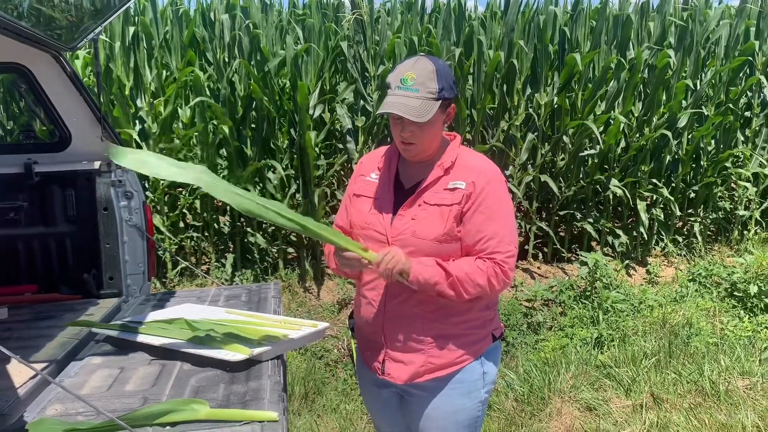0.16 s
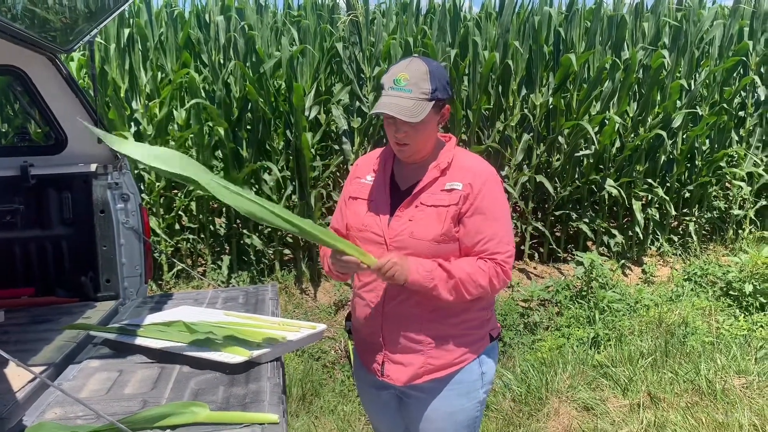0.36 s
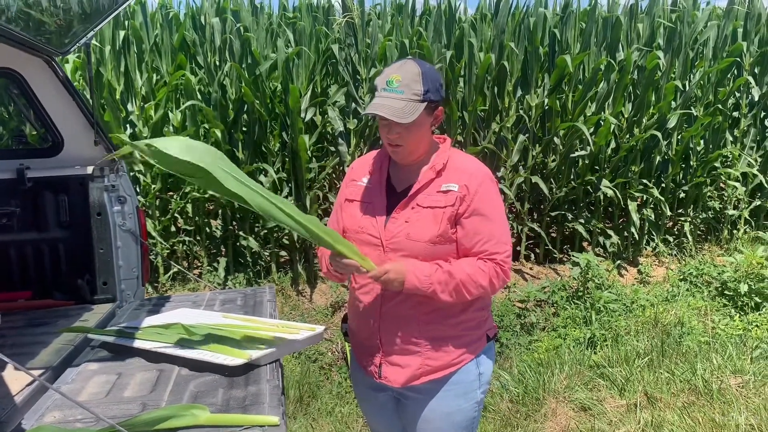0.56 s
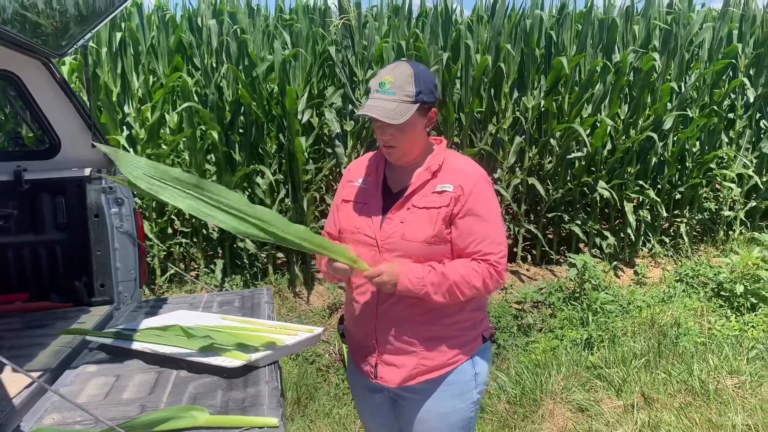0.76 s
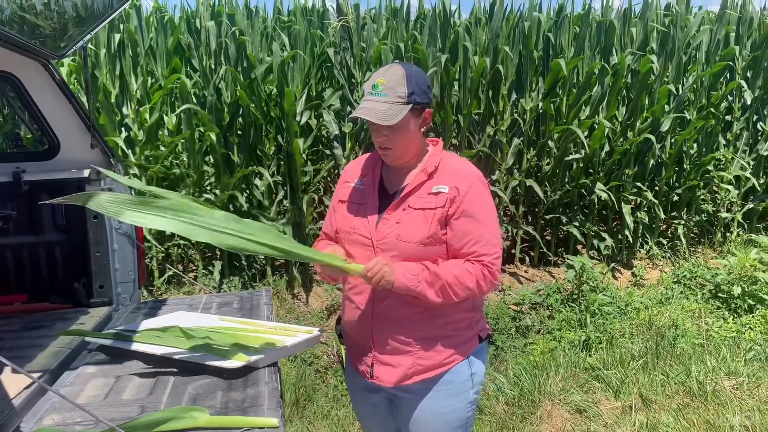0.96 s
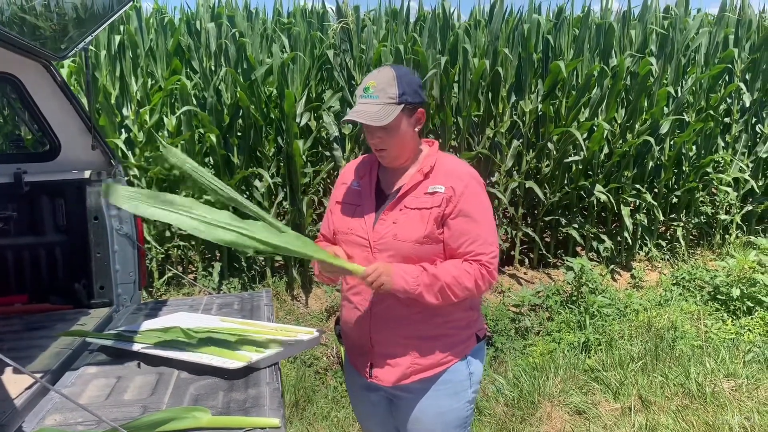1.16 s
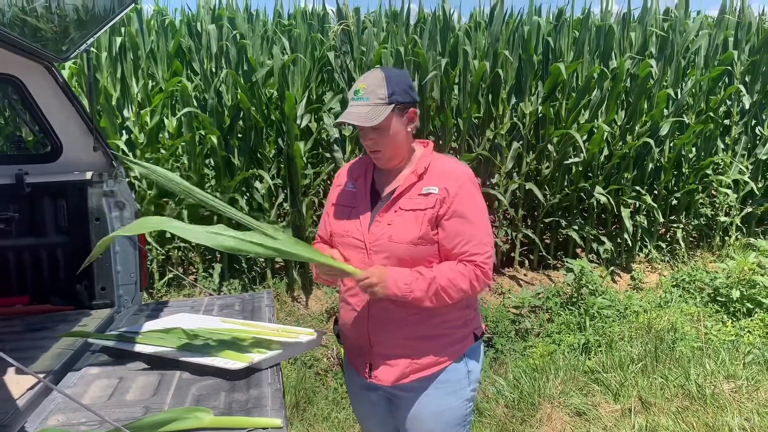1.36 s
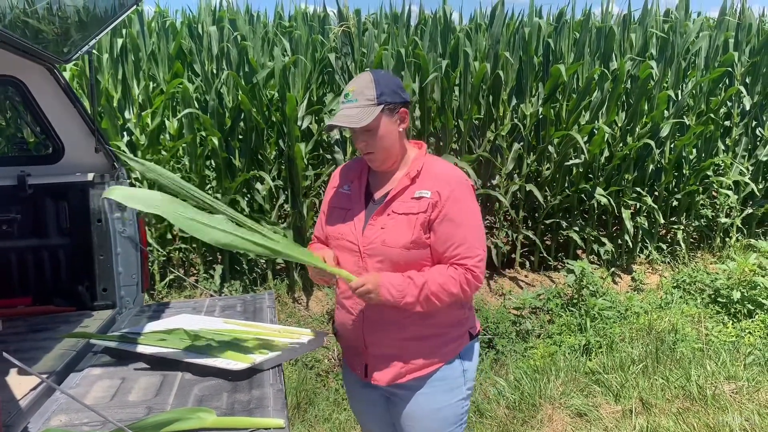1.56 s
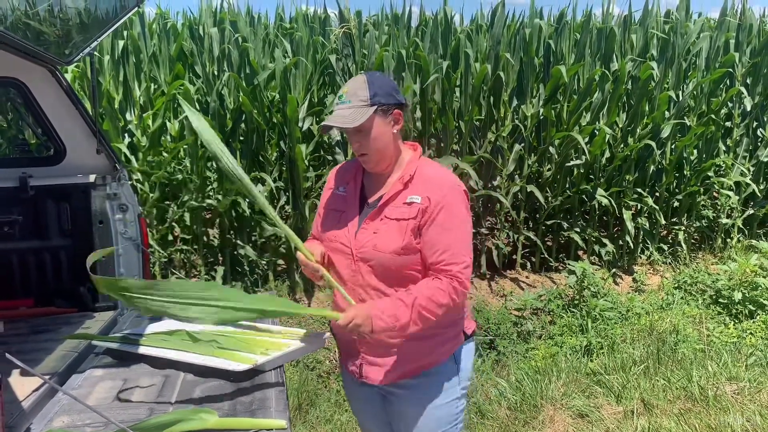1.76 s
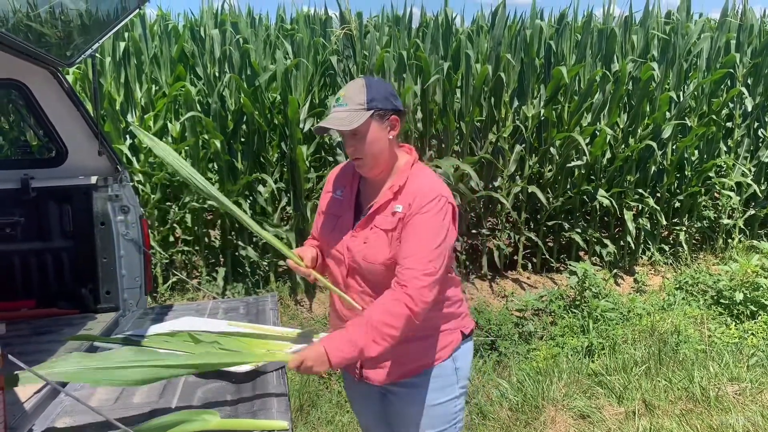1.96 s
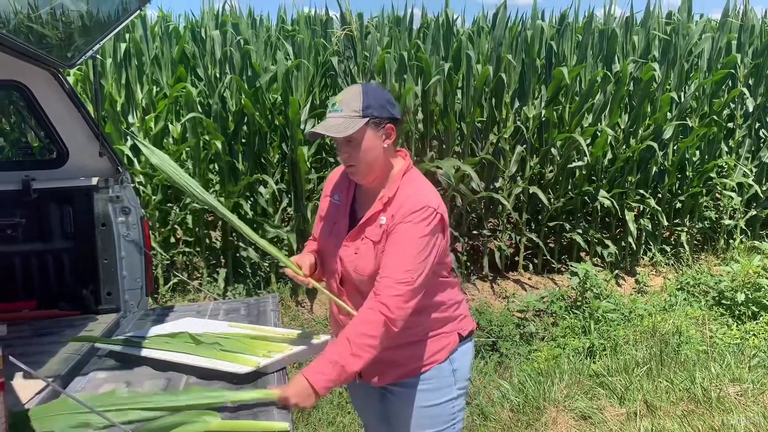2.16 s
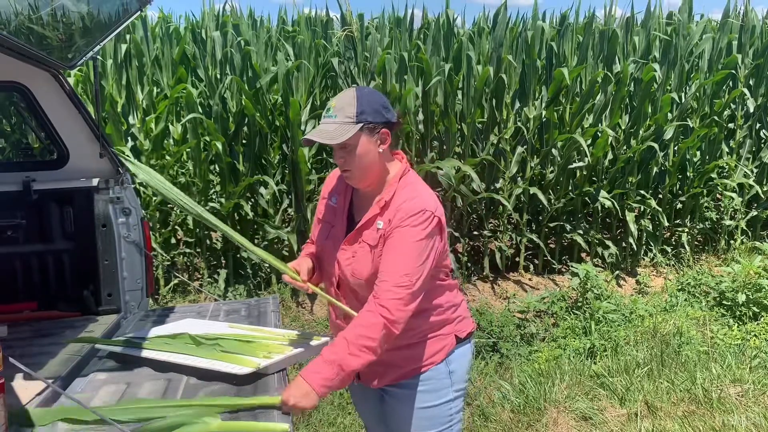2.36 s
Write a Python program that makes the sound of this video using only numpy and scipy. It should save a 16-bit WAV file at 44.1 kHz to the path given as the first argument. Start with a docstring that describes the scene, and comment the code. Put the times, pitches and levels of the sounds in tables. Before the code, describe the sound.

Fresh corn leaves are peeled off by hand: sharp snaps and dull flexing thwips, a hollow crunch, more crackles, then a soft pat and slide on a truck tailgate; close stereo microphone outdoors, low rumble.

```python
"""Long green corn leaves are peeled off a stalk by hand, over a low outdoor rumble, a faint hiss and rustling sleeves.
First ribs snap (crumbling cracks and a ringing tone) and leaves flex with dull falling thwips (dispersed pulses).
The rolled stem then crunches when squeezed (hollow bursts), and more snaps follow, with blades rubbing (noisy grains).
Last the freed leaf pats a truck's tailgate (clicks), whose panel hums (sine modes); it slides and its edge scrapes."""
import sys
import numpy as np
from scipy import signal
from scipy.fft import rfft, irfft
from scipy.io import wavfile

SR = 44100
rng = np.random.default_rng(int(sys.argv[2]) if len(sys.argv) > 2 else 0)


def bounce(signal):
    """Save signal as a 16-bit WAV file at the path given by the first command-line argument."""
    frames = np.transpose(np.atleast_2d(signal))
    limited = np.clip(frames, -1, 1)
    pcm = np.round(limited * 32767).astype(np.int16)
    wavfile.write(sys.argv[1], SR, pcm)


N = 110250
FFT_SIZE = 131072
HZ = np.fft.rfftfreq(FFT_SIZE, 1 / SR)
TIME_S = np.arange(N) / SR


def amp(db):
    """Decibels to gain."""
    return 10 ** (np.asarray(db) / 20)


def read(points):
    """Interpolates (hz, value) points over log frequency."""
    hz, value = np.transpose(points)
    return np.interp(np.log(HZ + 1), np.log(hz + 1), value)


def level(points):
    """Interpolates (time_s, level_db) points to a gain at every sample."""
    return amp(np.interp(TIME_S, *np.transpose(points)))


def evened(x):
    """Scales to rms 1."""
    return x / np.sqrt(np.mean(x ** 2) + 1e-20)


def delayed(start_s):
    """Spectrum of a unit pulse at this time."""
    return np.exp(-2j * np.pi * HZ * start_s)


def causal(db):
    """Minimum-phase response with these gains: it rings only after its cause."""
    log_gain = np.log(amp(np.concatenate([db, db[-2:0:-1]])))
    return np.exp(np.conj(signal.hilbert(log_gain)))[:len(HZ)]


# likeness of the two microphones: hz, left_right_likeness [-1 to 1]
MIC_LIKENESS = [(30, 0.42), (100, 0.52), (300, 0.67), (800, 0.57), (1400, 0.96), (2400, 0.2), (4200, 0.1),
                (6000, -0.13), (9000, 0.069)]


def spread(pair):
    """Mixes two unrelated signals into left and right spectra, partly alike as at the two microphones."""
    a, b = rfft(pair, FFT_SIZE)
    likeness = np.clip(read(MIC_LIKENESS), -.99, .99)
    mid = a * np.sqrt((1 + likeness) / 2)
    side = b * np.sqrt((1 - likeness) / 2)
    return np.array([mid + side, mid - side])


# microphone phase for direct sound: hz, left_lead_rad
MIC_PHASE = [(30, 1), (1500, 0.54), (4200, 2.2), (6000, -3.5), (9000, -3)]


def direct():
    """Phase response of the two microphones to sound arriving straight from the hands."""
    return np.exp(.5j * np.outer([1, -1], read(MIC_PHASE)))


def sound(spectra):
    """Spectra back to samples."""
    return irfft(spectra, FFT_SIZE)[..., :N]


def grains(per_s, spread_db, size):
    """Two trains of random one-sample clicks of uneven strength and random sign."""
    strength = amp(spread_db * np.minimum(rng.exponential(1, (2, size)), 4))
    sign = rng.choice([-1, 1], (2, size))
    present = rng.random((2, size)) < per_s / SR
    return strength * sign * present


def coloured(pair, colour):
    """A steady stereo texture of rms 1, its spectrum shaped by the colour."""
    return evened(sound(spread(pair) * amp(read(colour))))


CRUMBLES_PER_S, CRUMBLE_SPREAD_DB = 5000, 4.5
CRACK_DB, CRUMBLE_DB = -4.5, -3


def crumble(decay_s):
    """Spectra of a first crack and the decaying burst of tearing fibres that follows it."""
    t = TIME_S[:SR // 10]
    clicks = grains(CRUMBLES_PER_S, CRUMBLE_SPREAD_DB, len(t)) * np.exp(-t / decay_s)
    fibres = evened(clicks) / np.sqrt(len(t))
    return amp(CRACK_DB) * direct() + amp(CRUMBLE_DB) * spread(fibres)


# flexing thwips: start_s, level_db, sweep_cycles [a tone is this many of its periods late], bass_db, treble_db
FLEX_EVENTS = [(0.2170, -3.5, 1.66, -3, 0.5), (0.2335, -10.5, 1.45, 2.5, 7.5),
               (0.3589, -19, 2.17, -22, -17), (0.3736, -32.5, 0.783, 23.5, -55),
               (2.0860, -34, 11, -11, -32)]
# spectrum of a flex: hz, level_db
FLEX_SPECTRUM = [(25, -6), (60, 0.5), (130, 3.5), (300, 2), (600, -5.5), (1050, -21), (2400, -25.5),
                 (3000, -38), (4200, -44), (5300, -54), (6500, -31.5), (8000, -53.5), (10000, -80)]
FLEX_DB, FLEX_BASS_HZ, FLEX_TREBLE_HZ = 22.5, 132, 2270
FLEX_LEFT_LEAD_S, FLEX_SCUFF_DB = 0.000092, -18.5
FLEX_ECHO_S, FLEX_ECHO_DB = 0.0113, -27.5


def flexes():
    """A jolt runs along the leaf as a bending wave: treble arrives first, bass last."""
    bass = 1 / (1 + (HZ / FLEX_BASS_HZ) ** 2)
    treble = HZ ** 2 / (HZ ** 2 + FLEX_TREBLE_HZ ** 2)
    waves = 0
    for start_s, level_db, sweep_cycles, bass_db, treble_db in FLEX_EVENTS:
        tone_db = read(FLEX_SPECTRUM) + bass_db * bass + treble_db * treble
        dispersion = np.exp(-2j * np.pi * sweep_cycles * np.log((HZ + 2) / FLEX_BASS_HZ))
        waves = waves + amp(FLEX_DB + level_db + tone_db) * delayed(start_s) * dispersion
    # bass returns from the tip
    waves = waves * (1 + amp(FLEX_ECHO_DB) * delayed(FLEX_ECHO_S) / (1 + (HZ / 500) ** 2))
    # the blade scuffs as it bends
    waves = waves * (1 + amp(FLEX_SCUFF_DB) * crumble(0.024) * np.clip(HZ / 600, 1, 3))
    lead_cycles = FLEX_LEFT_LEAD_S * HZ / (1 + (HZ / 900) ** 2)  # the lead fades in the treble
    return sound(waves * direct() * np.exp(1j * np.pi * np.outer([1, -1], lead_cycles)))


# snapping ribs and fibres: start_s, level_db, brightness_db_per_octave, crumble_decay_s, rib_ring_db
SNAP_EVENTS = [(0.0438, -33, 8, 0.001, -16), (0.0757, -26, -2, 0.0017, 12.5),
               (0.1998, -21.5, -7.5, 0.0072, -21), (0.2510, -9, 0.5, 0.0022, 2),
               (0.2756, -13, 1, 0.0064, 6), (0.2819, -14, -3.5, 0.0036, 5.5), (0.29, -18, 1.5, 0.0026, 8),
               (0.4014, -6.5, -5.5, 0.0032, 3.5), (0.4050, -10, 1, 0.0059, -9.5),
               (0.8107, -21.5, -2.5, 0.015, 4), (0.859, -21.5, -1.5, 0.0046, 2.5),
               (0.9569, -31.5, -12.5, 0.0092, 10), (0.9846, 1, 1, 0.0023, 7.5),
               (0.9890, -15, -3, 0.0053, 1), (0.9983, -8.5, 0, 0.016, -3), (1.0548, -16, 3, 0.0026, -20),
               (1.5121, -26.5, 2.5, 0.0085, 2), (1.5228, -20, 3.5, 0.0047, 7),
               (1.579, -18.5, 3.5, 0.0084, 1), (1.799, -34, 3.5, .003, -2),
               (1.9097, -29.5, -0.5, 0.023, 7.5)]
# spectrum of a crack: hz, level_db
SNAP_SPECTRUM = [(150, -2), (500, -15), (900, -5), (1500, -5), (1950, -2.5), (2500, 4), (2950, -11.5),
                 (3550, -3.5), (3950, -9.5), (4550, 0), (5300, -15), (6300, -6.5), (7500, -14),
                 (8400, -9.5), (9300, -24.5), (10200, -51)]
SNAP_DB = -6
RIB_HZ, RIB_RISE_S, RIB_DB, RIB_ECHO_DB = 1656, 0.00094, -36, -7.5


def snaps(space):
    """Each snap is a crumbling crack and a few cycles of the ringing rib."""
    t = TIME_S[:SR // 10]
    swell = t / RIB_RISE_S * np.exp(1 - t / RIB_RISE_S)
    rib = rfft(swell * np.sin(2 * np.pi * RIB_HZ * t), FFT_SIZE)
    octaves = np.log2(np.clip(HZ, 500, None) / 2500)
    cracks, rings = 0, 0
    for start_s, level_db, bright_db, decay_s, ring_db in SNAP_EVENTS:
        hit = amp(level_db) * delayed(start_s)
        cracks = cracks + hit * amp(SNAP_DB + bright_db * octaves) * crumble(decay_s)
        rings = rings + hit * amp(RIB_DB + ring_db)
    cracks = cracks * causal(read(SNAP_SPECTRUM)) * (1 + space)
    rings = rings * rib * (1 + amp(RIB_ECHO_DB) * space)
    return sound(cracks + rings)


# soft crunches as the rolled stem is squeezed: start_s, level_db, crumble_decay_s
CRUNCH_EVENTS = [(0.6035, -9.5, 0.0098), (0.6185, -2, 0.0017), (0.6335, 2, 0.0044), (0.6400, 1, 0.0052)]
# spectrum of a crunch: hz, level_db
CRUNCH_SPECTRUM = [(200, -8), (600, -16), (820, 6), (1200, 7), (1600, -9), (2200, -6), (2900, -21.5),
                   (3600, -2.5), (4500, -11), (5300, -41), (8500, -23.5), (10000, -41)]
CRUNCH_DB = -20


def crunches(space):
    """Duller, hollow bursts from inside the roll of leaves."""
    bursts = 0
    for start_s, level_db, decay_s in CRUNCH_EVENTS:
        bursts = bursts + amp(CRUNCH_DB + level_db) * delayed(start_s) * crumble(decay_s)
    return sound(bursts * causal(read(CRUNCH_SPECTRUM)) * (1 + amp(-6) * space))


# the leaf pats the tailgate: start_s, level_db
PAT_EVENTS = [(2.0844, 7), (2.0872, 7), (2.0897, 3.5)]
# spectrum of a pat: hz, level_db
PAT_SPECTRUM = [(150, 0), (400, -7), (700, -11), (1000, -1), (1500, -0.5), (1900, -16.5), (2500, -33),
                (9000, -36)]
PAT_DB = -19


def pats(space):
    """The leaf lands with a few soft, quick contacts."""
    hits = sum(amp(PAT_DB + level_db) * delayed(start_s) for start_s, level_db in PAT_EVENTS)
    return sound(hits * causal(read(PAT_SPECTRUM)) * (direct() + amp(-8) * space))


# tailgate panel modes: mode_hz, level_db [before PANEL_DB], t60_s
PANEL_MODES = [(283, -61.5, 0.21), (327.5, -57, 0.22), (381.5, -52, 0.13), (461, -47.5, 0.056)]
PANEL_DB, PANEL_RISE_S = 9, 0.024


def panel():
    """The tailgate's low modes swell and die after the first pat."""
    t = np.maximum(TIME_S - PAT_EVENTS[0][0], 0)
    modes = 0
    for mode_hz, level_db, t60_s in PANEL_MODES:
        tone = np.sin(2 * np.pi * (mode_hz * t + rng.random()))
        modes = modes + amp(level_db - 60 * t / t60_s) * tone
    return amp(PANEL_DB) * (1 - np.exp(-t / PANEL_RISE_S)) * modes


SLIPS_PER_S, SLIP_SPREAD_DB = 2500, 3.5


def friction(curve, colour):
    """Dense tiny slips over a bed of noise, following a level curve."""
    slips = grains(SLIPS_PER_S, SLIP_SPREAD_DB, N) + 0.32 * rng.standard_normal((2, N))
    return level(curve) * coloured(slips, colour)


# blade on blade: time_s, level_db
RUB_LEVEL = [(0, -58), (.03, -68), (.09, -68.5), (.19, -73.5), (.32, -71.5), (.55, -82), (.6, -80),
             (.66, -78), (.69, -62), (.75, -66), (.79, -69), (.86, -65.5), (.92, -72.5), (.97, -59),
             (1.12, -75.5), (1.3, -79), (1.48, -78.5), (1.54, -66), (1.7, -83.5), (1.93, -77),
             (2.05, -82.5), (2.5, -84)]
# its spectrum: hz, level_db
RUB_SPECTRUM = [(150, 4.5), (500, 0), (1000, 0), (1700, 6), (2400, -0.5), (2900, -8), (3900, -4.5),
                (5200, -15), (6300, -5.5), (7500, -17), (8500, -12.5), (10000, -31.5)]


def rub():
    """Friction of blade on blade."""
    return friction(RUB_LEVEL, RUB_SPECTRUM)


# leaf sliding on the tailgate: time_s, level_db
SLIDE_LEVEL = [(0, -97), (1.45, -107), (1.7, -74), (2.07, -79), (2.11, -60.5), (2.16, -69.5), (2.23, -63),
               (2.33, -68), (2.42, -71), (2.5, -62)]
# its spectrum: hz, level_db
SLIDE_SPECTRUM = [(100, 5), (330, -15.5), (600, -9), (1100, 0), (1650, -1), (2200, -22), (3000, -20.5),
                  (4200, -20), (5300, -26), (8300, -18.5), (10000, -38)]


def slide():
    """Friction of the blade on the tailgate."""
    return friction(SLIDE_LEVEL, SLIDE_SPECTRUM)


# bright scrape of the blade's edge: time_s, level_db
SCRAPE_LEVEL = [(2.449, -92), (2.453, -63.5), (2.468, -62), (2.485, -54.5), (2.5, -58)]
# its spectrum: hz, level_db
SCRAPE_SPECTRUM = [(500, -11), (2300, -2), (2700, -11), (3200, -2.5), (4200, 8.5), (5000, -19.5),
                   (6500, -9.5), (8500, -8), (10000, -37)]


def scrape():
    """Bright friction of the blade's edge."""
    return friction(SCRAPE_LEVEL, SCRAPE_SPECTRUM)


# sleeves moving: time_s, level_db
SLEEVE_LEVEL = [(0, -66), (.17, -66), (.33, -65.5), (.5, -80), (.75, -71), (1.05, -70), (1.3, -105),
                (1.6, -80.5), (1.75, -68), (1.95, -79), (2.05, -78.5), (2.17, -65), (2.3, -74.5),
                (2.5, -80)]
# their spectrum: hz, level_db
SLEEVE_SPECTRUM = [(60, -2.5), (150, -2), (300, 2), (420, -4), (600, -21.5), (850, -4.5), (1400, -34.5),
                   (5000, -43)]


def sleeves():
    """Dull friction of cloth."""
    return friction(SLEEVE_LEVEL, SLEEVE_SPECTRUM)


EARLY_T60_S, EARLY_DB = 0.066, -0.5
TAIL_T60_S, TAIL_DB = 0.22, -7


def surroundings():
    """Spectra of decaying noise echoes: quick scatter off the truck and a longer, fainter tail."""
    t = TIME_S[:SR // 2]
    taps = 0
    for t60_s, level_db in (EARLY_T60_S, EARLY_DB), (TAIL_T60_S, TAIL_DB):
        tail = rng.standard_normal((2, len(t))) * amp(-60 * t / t60_s) * (t > .002)
        taps = taps + amp(level_db) * evened(tail) / np.sqrt(len(t))
    return spread(taps)


# low rumble swelling: time_s, level_db [before RUMBLE_DB]
RUMBLE_LEVEL = [(0.0, -51), (0.06, -59), (0.1, -45.5), (0.18, -58), (0.26, -40.5), (0.3, -57.5), (0.4, -47),
                (0.42, -53.5), (0.66, -58.5), (0.7, -72), (0.76, -45), (0.8, -62.5), (0.88, -47.5),
                (0.94, -58.5), (0.99, -52.5), (1.22, -57), (1.25, -47.5), (1.36, -61), (1.39, -51),
                (1.43, -61.5), (1.52, -51.5), (1.83, -62.5), (1.98, -51.5), (2.06, -55), (2.22, -52.5),
                (2.37, -62.5), (2.46, -49), (2.5, -54)]
# its spectrum: hz, level_db
RUMBLE_SPECTRUM = [(10, -23), (28, -6.5), (45, -1.5), (60, 2), (85, -8), (120, -17), (180, -31),
                   (300, -40.5), (700, -46), (3000, -123.5)]
# spectrum of the still air: hz, level_db
AIR_SPECTRUM = [(100, 4), (300, 5.5), (600, -7.5), (1000, 5.5), (1600, -5.5), (2800, -16), (4200, -11.5),
                (5300, -19.5), (6500, -7.5), (7500, -19.5), (8400, -12.5), (9800, -16.5), (12500, -14.5)]
RUMBLE_DB, AIR_DB = 1, -76


def outdoors():
    """Shaped noise: a swelling low rumble under a faint even hiss."""
    rumble = level(RUMBLE_LEVEL) * coloured(rng.standard_normal((2, N)), RUMBLE_SPECTRUM)
    air = coloured(rng.standard_normal((2, N)), AIR_SPECTRUM)
    return amp(RUMBLE_DB) * rumble + amp(AIR_DB) * air


def scene():
    """All the leaf sounds in the open air."""
    space = surroundings()
    leaf = flexes() + snaps(space) + crunches(space)
    landing = pats(space) + panel()
    rubbing = rub() + slide() + scrape() + sleeves()
    return leaf + landing + rubbing + outdoors()


# microphone balance: hz, left_minus_right_db
MIC_BALANCE = [(30, 1.5), (500, 0.5), (1500, .5), (3000, 0), (6500, 0.5), (7500, -4.5), (8500, -12),
               (9500, -1.5), (11000, 0)]
EDGE_HZ = 12800


def record(dry):
    """The right microphone is brighter at the top; then a lowpass sets the band limit."""
    gains = amp(np.outer([.5, -.5], read(MIC_BALANCE)))
    heard = sound(rfft(dry, FFT_SIZE) * gains)
    lowpass = signal.firwin(255, EDGE_HZ, window=("kaiser", 8), fs=SR)
    return signal.oaconvolve(heard, lowpass[None], "same")


dry = scene()
out = record(dry)
bounce(out)
```